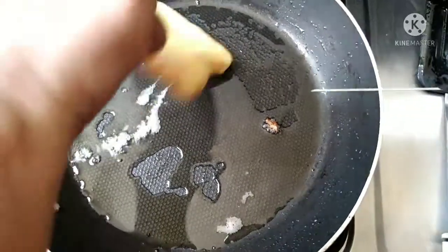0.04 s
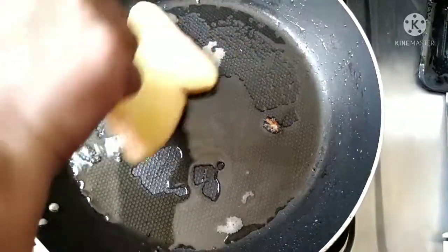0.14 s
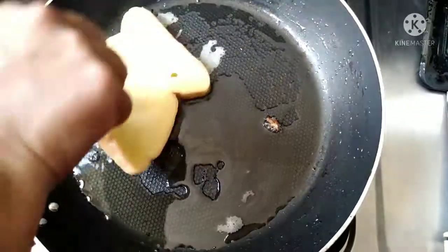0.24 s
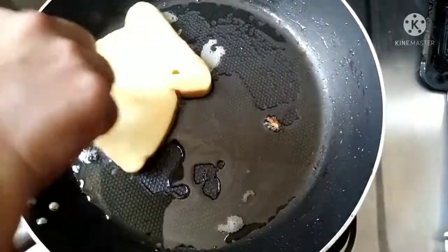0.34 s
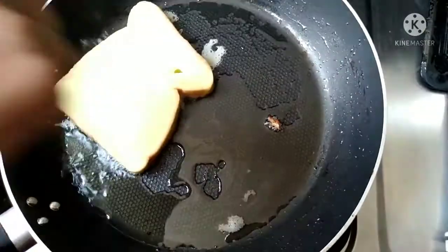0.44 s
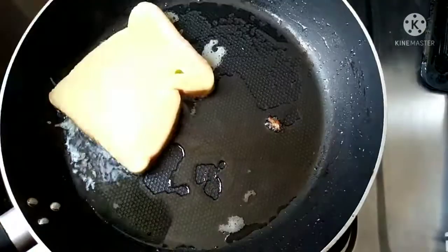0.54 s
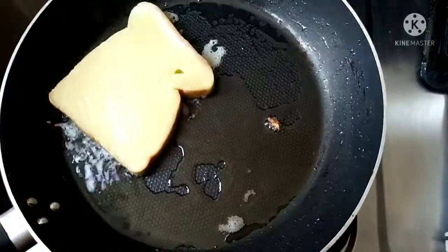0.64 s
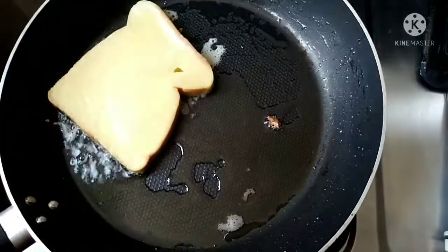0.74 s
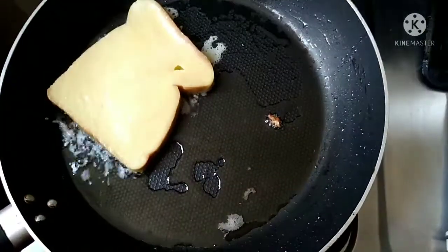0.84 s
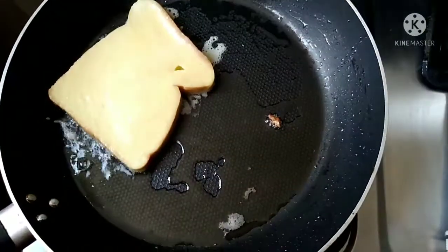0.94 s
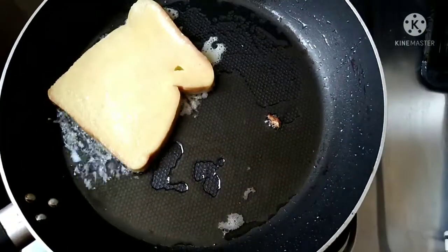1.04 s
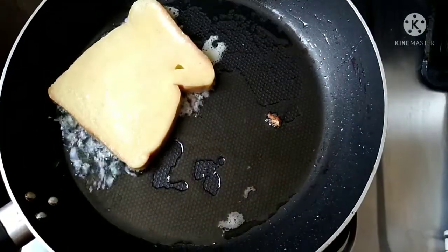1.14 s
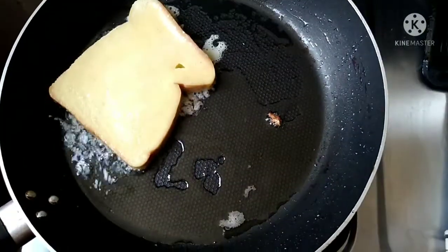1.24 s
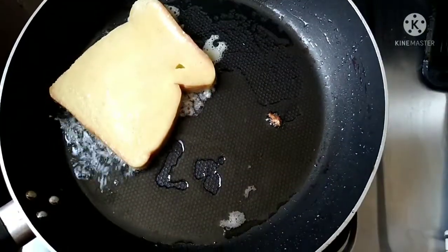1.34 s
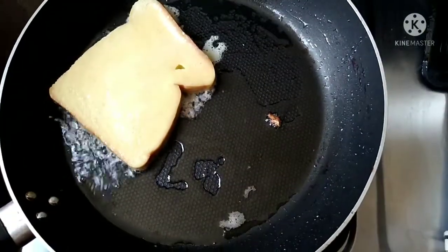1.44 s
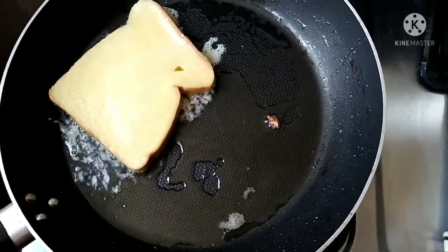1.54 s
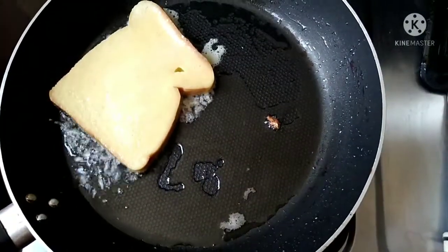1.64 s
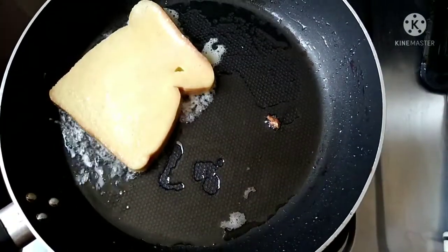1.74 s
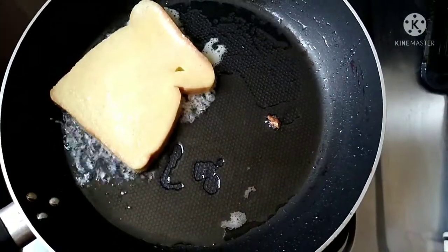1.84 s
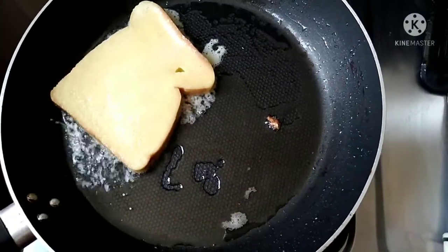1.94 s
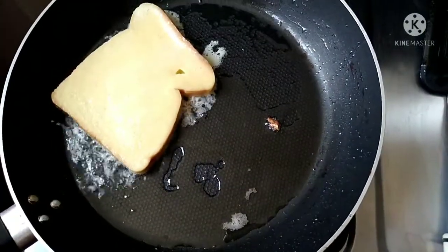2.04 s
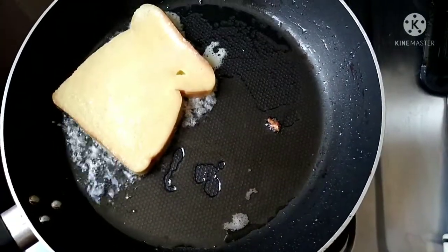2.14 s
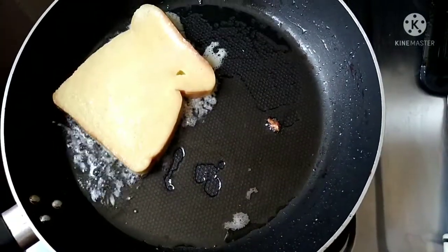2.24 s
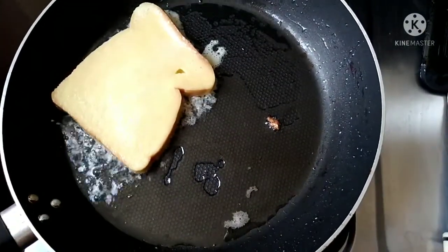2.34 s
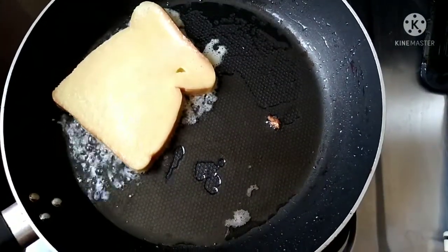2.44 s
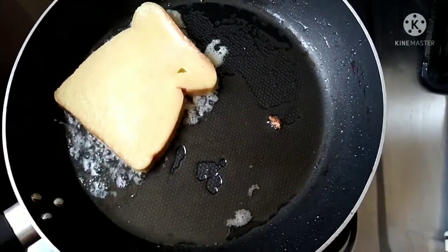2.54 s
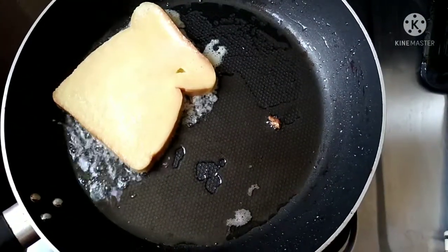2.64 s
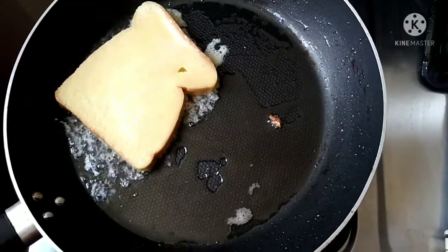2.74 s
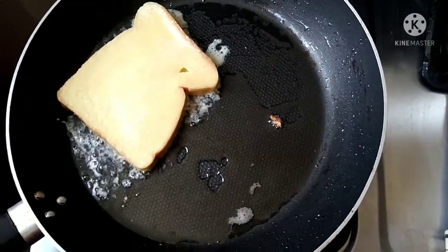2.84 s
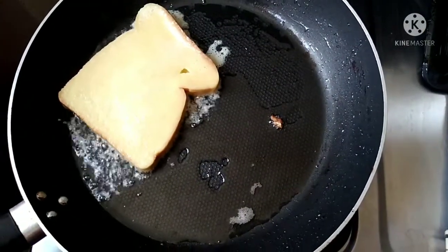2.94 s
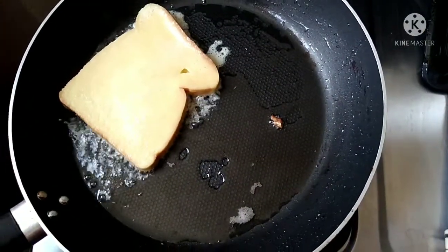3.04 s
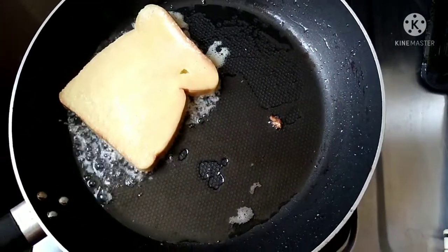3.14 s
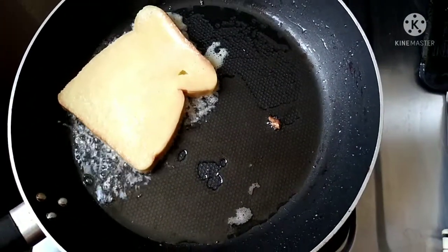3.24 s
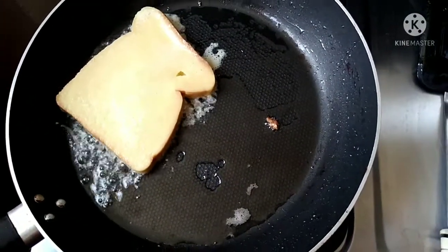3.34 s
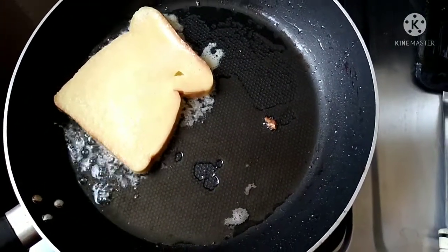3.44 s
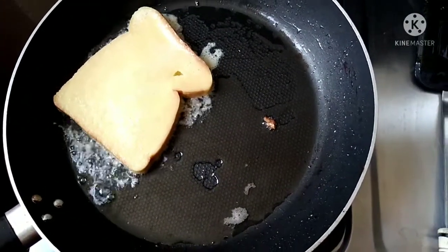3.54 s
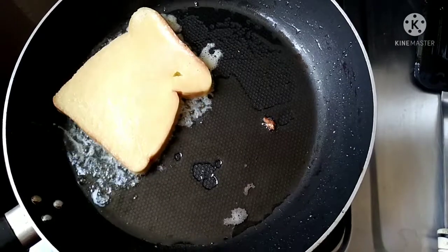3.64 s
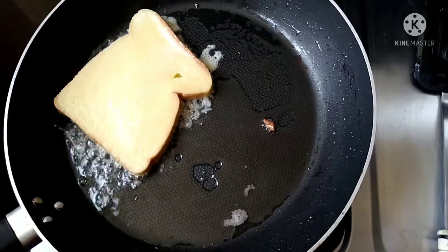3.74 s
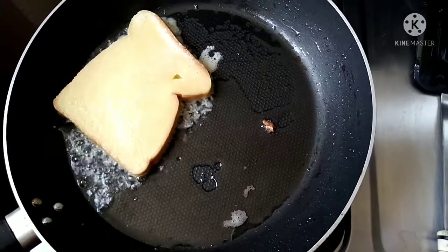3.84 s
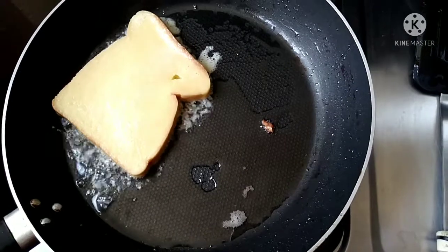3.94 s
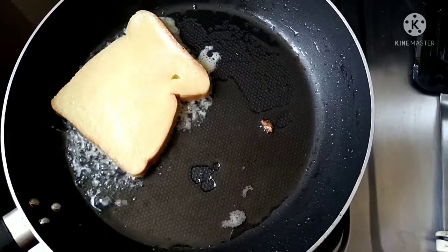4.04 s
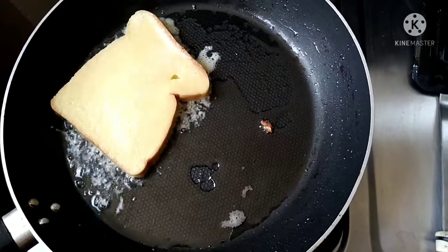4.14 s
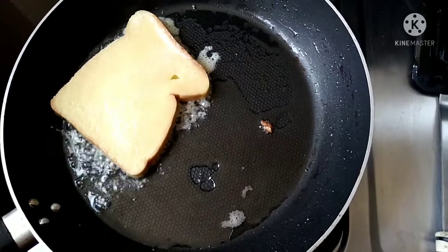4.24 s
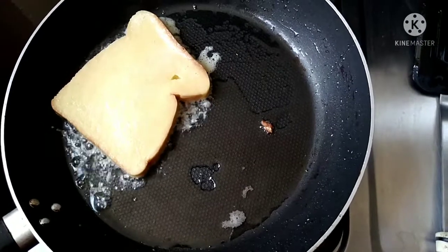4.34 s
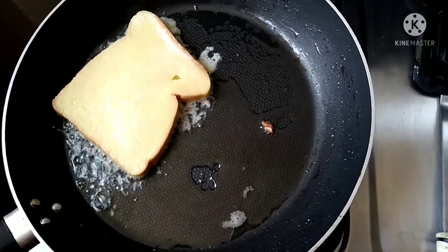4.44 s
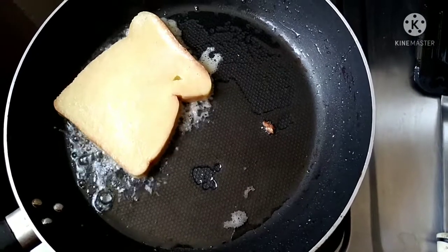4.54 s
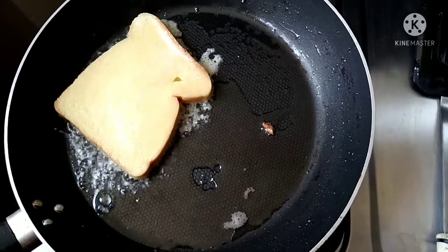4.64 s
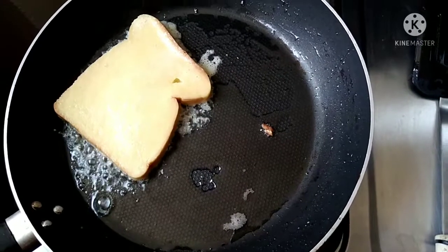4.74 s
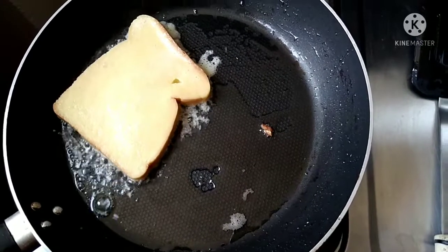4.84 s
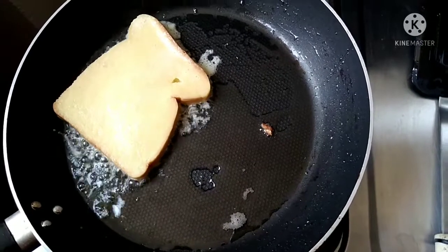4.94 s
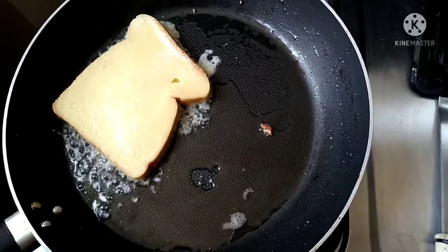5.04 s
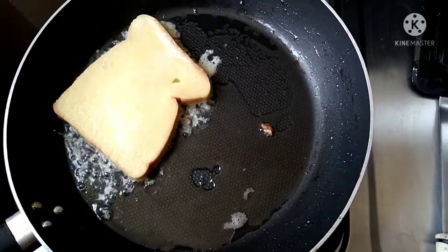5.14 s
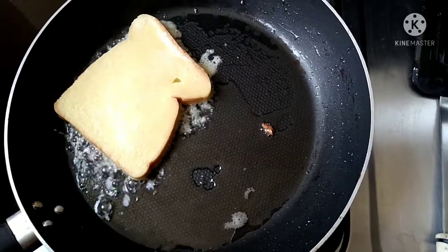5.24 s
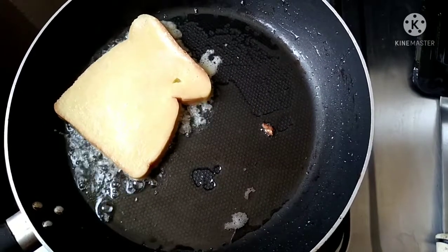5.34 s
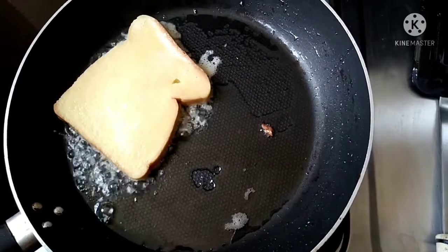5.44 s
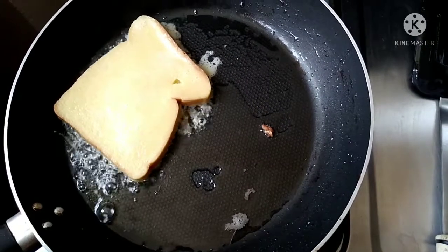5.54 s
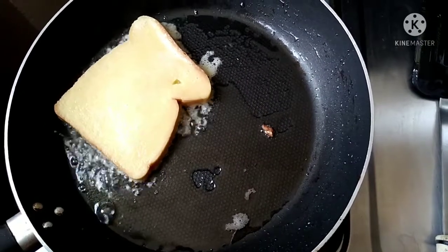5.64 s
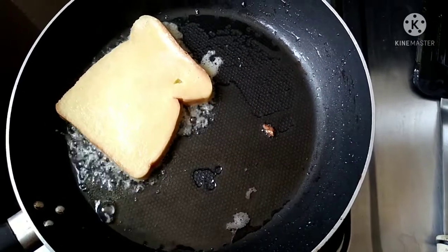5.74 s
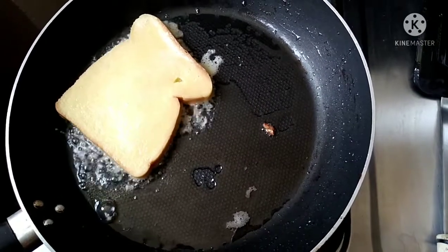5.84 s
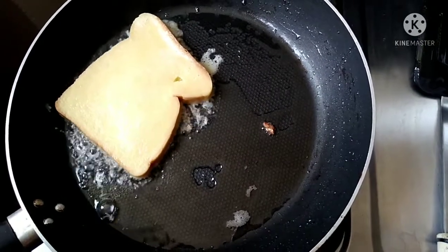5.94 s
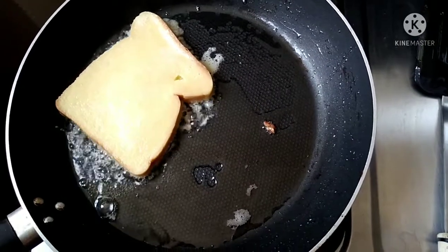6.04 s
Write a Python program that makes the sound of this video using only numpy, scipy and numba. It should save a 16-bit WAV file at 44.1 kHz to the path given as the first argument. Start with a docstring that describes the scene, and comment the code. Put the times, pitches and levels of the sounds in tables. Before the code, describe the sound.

Soaked bread goes into hot fat and sizzles brightly, growing denser with crackles and sharp spits, over a faint low rumble and a passing engine.

```python
"""Soaked bread in hot fat

Soaked bread fries close to two microphone ports: a crowd of small ringing steam bubbles makes a dense fizz.
Larger bubbles sputter in clusters and spitting fat snaps; shifting noise tails stand in for the pan wall.
Outside an engine gathers speed: sine orders swell and fade as they cross the kitchen's pitches, then die.
Filtered noise rumbles low beneath, and one dull bump is a handful of slow ringing pulses."""
import sys
import numpy as np
from scipy import signal
from scipy.fft import rfft, irfft, next_fast_len
from scipy.io import wavfile
from scipy.ndimage import uniform_filter1d
from numba import njit

SR = 44100
rng = np.random.default_rng(int(sys.argv[2]) if len(sys.argv) > 2 else 0)


def wav_record(signal):
    """Record a signal, one row per channel, as 16-bit PCM in the file named by sys.argv[1]."""
    frames = np.transpose(np.atleast_2d(signal))
    bounded = np.clip(frames, -1, 1)
    # unit amplitude maps onto the largest positive 16-bit level
    quanta = np.round(bounded * 32767).astype(np.int16)
    wavfile.write(sys.argv[1], SR, quanta)


N = 268392

# All source levels are mix settings, ahead of layer trims and the port colour.
# course of the frying: t/s, fizz level/dB, fine spray over fizz level/dB
FRYING = [(0.0, -32, -2.5), (0.52, -31.5, -4), (1.17, -26, -8), (1.4, -28, -8), (1.62, -26, -4),
          (1.72, -33, -0.5), (1.86, -25.5, -5.5), (2.6, -25, -6.5), (3.35, -25, -6.5), (3.6, -23, -7),
          (5.5, -22, -6), (5.75, -24, -6.5), (6.09, -24.5, -5)]
# fizz bubble sizes heard as pitch: f/Hz, level/dB
BUBBLE_SIZES = [(500, -40), (1500, -20.5), (2200, 3), (2800, 1), (4800, 5), (5300, -14), (7000, -3)]
# loudest sputters of large bubbles: t/s of the peak, level/dB, f/Hz, length/ms
LOUD_SPUTTERS = [(0.5601, -13.5, 2800, 4.2), (0.579, -21, 2570, 5.5), (0.764, -19, 3360, 3.1),
                 (0.8184, -17, 3280, 6), (0.8601, -16, 2820, 5), (0.9115, -20, 3150, 9.5),
                 (0.984, -18.5, 3300, 8), (1.07, -16, 2800, 9.7), (1.143, -12.5, 3074, 5),
                 (1.197, -15, 2574, 21), (1.246, -15.5, 3050, 9), (1.3034, -9.5, 3230, 3.9),
                 (1.3226, -17.5, 4930, 28), (1.362, -13.5, 3600, 10), (1.4822, -18.5, 3380, 12.3),
                 (1.5167, -13, 3110, 4), (1.5232, -11.5, 3100, 3.6), (1.553, -11.5, 2800, 8),
                 (1.658, -14.5, 4400, 8.4), (1.7784, -9.5, 2850, 15), (1.862, -15.5, 3620, 24),
                 (1.8753, -10.5, 2990, 4), (1.9056, -18, 3600, 17), (1.931, -14.5, 3770, 8),
                 (1.948, -12, 4230, 5.3), (1.9775, -16, 4430, 4.4), (2.0167, -6.5, 3020, 6),
                 (2.054, -12.5, 3620, 6), (2.064, -14, 3750, 17), (2.112, -9.5, 2710, 6.1),
                 (2.1795, -12, 3720, 8), (2.195, -14.5, 3365, 4), (2.2527, -13.5, 3800, 5.5),
                 (2.314, -12, 3290, 11.5), (2.3268, -11.5, 3480, 21), (2.392, -9, 3080, 23),
                 (2.4647, -13.5, 4353, 5), (2.5043, -9, 3000, 12.6), (2.529, -15, 3400, 15.5),
                 (2.6213, -13, 3670, 24.5), (2.7435, -12.5, 2630, 10.8), (2.7747, -12.5, 4330, 5.3),
                 (2.897, -17, 2560, 21), (2.963, -14.5, 4130, 13.4), (2.9869, -11, 3100, 7),
                 (3.0044, -10.5, 2980, 8.3), (3.021, -8, 3420, 6.3), (3.057, -10.5, 2960, 7.3),
                 (3.0723, -6.5, 3360, 6), (3.116, -19, 3100, 9), (3.1707, -11.5, 3150, 8),
                 (3.2622, -16, 4270, 5), (3.2928, -13, 3007, 13.7), (3.325, -9, 3394, 7),
                 (3.4673, -14, 3450, 11), (3.488, -10, 3330, 5.1), (3.499, -6, 2500, 9),
                 (3.522, -9, 4256, 11.7), (3.5448, -7.5, 3400, 13), (3.5962, -9.5, 2650, 15.5),
                 (3.6788, -12.5, 3530, 7), (3.703, -14, 3900, 17), (3.7256, -11, 3720, 10),
                 (3.815, -16.5, 3240, 30), (3.8799, -7, 2880, 7.4), (3.9372, -11.5, 4730, 10),
                 (3.984, -9, 3120, 9.4), (4.0321, -14, 4630, 6), (4.0817, -10.5, 4310, 7.7),
                 (4.0962, -12, 4200, 6), (4.1382, -8.5, 3580, 4.1), (4.164, -17, 4400, 7),
                 (4.195, -15.5, 3140, 9), (4.2392, -13, 3550, 6), (4.373, -16, 4440, 6.5),
                 (4.3972, -10.5, 3520, 4.4), (4.4103, -9, 3830, 10), (4.4346, -12, 3760, 7),
                 (4.471, -11.5, 4430, 9), (4.5118, -1.5, 2970, 7.2), (4.566, -12, 3200, 13),
                 (4.613, -7.5, 2770, 12), (4.661, -10.5, 3630, 8.6), (4.918, -16, 4480, 4.5),
                 (4.9552, -11, 4380, 11), (5.069, -14, 2800, 12), (5.1227, -8.5, 2650, 14.3),
                 (5.1647, -11.5, 4700, 7), (5.1898, -13, 3870, 6), (5.2582, -11.5, 2920, 14),
                 (5.2793, -7, 3200, 6), (5.335, -9.5, 4500, 11.8), (5.3492, -5.5, 4420, 7),
                 (5.4187, -13, 2800, 13.5), (5.4887, -11, 3800, 7.2), (5.5078, -10.5, 2870, 10.3),
                 (5.5237, -9.5, 3500, 4), (5.5824, -11.5, 3380, 4), (5.732, -10.5, 3700, 6.5),
                 (5.779, -9.5, 3360, 9.6), (5.8373, -11.5, 3780, 8), (5.8714, -13, 2800, 7),
                 (5.921, -15.5, 3520, 13), (6.039, -10.5, 2800, 12), (6.0539, -6.5, 3200, 8.4)]
# loudest dry snaps of spitting fat: t/s, level/dB
FAT_SNAPS = [(0.029, -19), (0.221, -26), (0.377, -19), (0.397, -28), (0.447, -22), (0.655, -18),
             (0.7282, -18), (0.8674, -19), (1.1443, -21), (1.2048, -14), (1.6312, -12.5), (1.8519, -17),
             (1.9485, -15.5), (2.041, -12), (2.2149, -19), (2.2518, -15.5), (2.2955, -10.5), (2.534, -18),
             (2.575, -15), (2.6775, -16), (2.8315, -19), (2.8923, -9), (3.2839, -16), (3.5007, -13),
             (3.8058, -17), (3.885, -15), (4.168, -16), (4.2557, -17), (4.2983, -11.5), (4.506, -8.5),
             (4.629, -14), (4.8673, -21), (5.02, -8.5), (5.0509, -12.5), (5.215, -18), (5.6314, -11),
             (5.757, -15), (5.948, -23)]
# engine run-up: t/s, shaft rate f/Hz
SHAFT_RATE = [(0, 20.4), (.62, 20.54), (.8, 22), (1.86, 27.33), (2.74, 31.04), (3.5, 32.88), (4.3, 35.96)]
# multiples of the shaft rate that sound (no unit)
SHAFT_ORDERS = [2, 4, 5, 6]
# strength of each order ahead of the kitchen's response: level/dB
ORDER_LEVELS = [-38, -38.5, -36.5, -37.5]
# bass pitches the kitchen lets in or shuts out: f/Hz, level/dB
KITCHEN_RESPONSE = [(38, -4), (48, -19), (55, -7), (60, -25), (64.5, -5), (68, 0.5), (74, -12), (102, -22),
                    (113, 1), (124, -0.5), (129, -6.5), (135, -8), (142, -24), (153, -6.5), (163, -6),
                    (172, -19), (198, -39), (212, -8)]
# pulses of the dull bump: f/Hz, level/dB, length/cycles, delay/s
BUMP_PULSES = [(55, -22, 2, 0.0037), (30, -33, 1.5, 0.0053), (400, -34, 1.8, .006)]
# relative spectrum of the rumble: f/Hz, level/dB
RUMBLE_SPECTRUM = [(12, -20), (20, 13), (35, 1.5), (64, -1), (136, 2), (230, -5.5), (340, -9), (420, -11),
                   (750, -11), (1100, -16.5), (1800, -9.5), (2400, -5), (4000, -88)]
# colour of the microphone ports: f/Hz, left level/dB, right level/dB
PORT_COLOUR = [(30, 2, -1.5), (1270, 2, 1.5), (1800, -0.5, -4.5), (2330, -0.5, -10), (2650, 7, -9),
               (4540, 5.5, -3), (7470, 7.5, -5.5), (10040, 3, 6), (11700, 2, -2.5), (15500, -4, -9)]

LEFT_LAG_S, LAG_SPREAD_S, RIGHT_SPREAD_DB = 0.00024, .00003, 3
EBB_DB, EBB_MS = -1.5, 6.8  # the fizz ebbs just before a loud sputter
SWELL_MS, SWELL_SHARE = 1.494, .25  # a sputter's swell: this long plus this share of its length
SMALL_FROM_S = .55  # chance sputters start once the bread lies in the fat
SMALL_OVER_FIZZ_DB, SMALL_SPREAD_DB, SMALL_MS = -1.5, 7, 4.3
SMALL_CLEAR_S = .026  # chance sputters keep this far from loud ones
PAN_T60_S, PAN_DB = 0.051, -3.5
ENGINE_ON_S, ENGINE_RISE_S, ENGINE_FALL_S = 0.24, 0.13, 0.052
BUMP_S = 4.4995
RUMBLE_DB = -36  # RMS
TOP_HZ = 15700


def undb(db):
    """Turn dB into an amplitude factor."""
    return 10 ** (np.asarray(db) / 20)


def level(x, db):
    """Set the RMS of a sound in dB."""
    return x * undb(db) / np.sqrt(np.mean(x ** 2))


def along(hz, table, column=1):
    """Read a f/Hz, level/dB table on a log-frequency axis."""
    table = np.array(table, float)
    return np.interp(np.log(np.maximum(hz, 1)), np.log(table[:, 0]), table[:, column])


def colour(x, table, column=1):
    """Filter by a f/Hz, level/dB table."""
    size = next_fast_len(N)
    hz = np.arange(size // 2 + 1) * SR / size
    return irfft(rfft(x, size) * undb(along(hz, table, column)), size)[:N]


def walk(rate):
    """Random levels, each held for 1 / rate s and smoothed twice; spread near 1."""
    hold = int(SR / rate)
    steps = np.repeat(rng.standard_normal(N // hold + 1), hold)
    return 1.45 * uniform_filter1d(uniform_filter1d(steps, hold), hold)[:N]


@njit
def ring(length, start, hz, cycles, size, glide):
    """Each bubble swells and fades over some cycles while its pitch may glide."""
    out = np.zeros(length)
    for k in range(len(start)):
        tau = cycles[k] * SR / hz[k] / 4  # samples from the start to the envelope's peak
        first = int(start[k]) + 1
        for i in range(max(first, 0), min(first + int(8 * tau), length)):
            u = (i - start[k]) / tau
            swell = np.e * u * np.exp(-u)
            out[i] += size[k] * swell * np.sin(np.pi / 2 * cycles[k] * u * (1 + glide[k] * u / 8))
    return out


def bubbles(s, hz, cycles, db, glide, place):
    """Bubbles scattered in the pan: place shifts the left port's lag and the right port's level."""
    hz = np.clip(hz, 50, SR / 2.3)
    left_s = s + LEFT_LAG_S + LAG_SPREAD_S * place[0]
    left = ring(N, SR * left_s, hz, cycles, undb(db), glide)
    right = ring(N, SR * s, hz, cycles, undb(db + RIGHT_SPREAD_DB * place[1]), glide)
    return np.array([left, right])


def crowd(count, lo_hz, hi_hz, cycles, scatter_db, surge_db, shape):
    """Many small bubbles: a few are much louder than the rest, and all follow the surges."""
    when, pitch, big, long = rng.random((count, 4)).T
    place = rng.standard_normal((count, 2)).T
    hz = lo_hz * (hi_hz / lo_hz) ** pitch
    db = along(hz, shape) - scatter_db * np.log(1.002 - big)
    db = db + surge_db[(when * (N - 1)).astype(int)]
    return level(bubbles(when * N / SR, hz, cycles * (.5 + long), db, 0 * hz, place), 0)


def fizz():
    """Millimetre bubbles fizz, spray hisses above, droplets tick; louder frying surges harder."""
    s, fizz_db, spray_db = np.transpose(FRYING)
    t = np.arange(N) / SR
    fizz_db = np.interp(t, s, fizz_db)
    spray_db = np.interp(t, s, spray_db)
    surge_depth = np.clip((fizz_db + 37) / 9, 0, 1)
    surge_db = surge_depth * (1.43 * walk(7) + 0.41 * walk(24.916) + 1.9 * walk(90))
    body = crowd(count=17000, lo_hz=492, hi_hz=6800, cycles=5.53, scatter_db=2.0,
                 surge_db=surge_db, shape=BUBBLE_SIZES)
    spray = crowd(count=20000, lo_hz=5340, hi_hz=15800, cycles=1.95, scatter_db=2.5,
                  surge_db=surge_db, shape=[(6000, 4.0), (16000, -6)])
    ticks = crowd(count=1100, lo_hz=2800, hi_hz=13100, cycles=2.1, scatter_db=4.0,
                  surge_db=surge_db, shape=[(2500, 5), (13000, -4)])
    mix = undb(-3.0) * body + undb(-8.5) * ticks + undb(spray_db - 2.5) * spray
    return undb(fizz_db) * mix


def ebb():
    """Gain of the fizz: it sinks towards the start of each loud sputter."""
    t = np.arange(N) / SR
    starts = [s - (SWELL_MS + SWELL_SHARE * ms) / 1000 for s, _, _, ms in LOUD_SPUTTERS]
    starts = np.sort(starts + [np.inf])  # no ebb after the last one
    wait_ms = (starts[np.searchsorted(starts, t)] - t) * 1000
    return undb(EBB_DB * np.exp(-wait_ms / EBB_MS))


def sputters(count=16):
    """One large bubble rings out; neighbours burst in a string before and after it, and spray flies."""
    rows = np.vstack([LOUD_SPUTTERS, small_sputters()])
    s, db, hz, length_ms = (np.repeat(c, count) for c in rows.T)
    swell_ms = np.minimum(SWELL_MS + SWELL_SHARE * length_ms, .8 * length_ms)
    fade_ms = length_ms - swell_ms
    when, pitch, big, fine = rng.random((len(s), 4)).T
    place = np.repeat(rng.standard_normal((len(rows), 2)), count, axis=0).T
    turn = np.arange(len(s)) % count
    lead = turn == 0
    ms = np.where(lead, 0, length_ms * (turn - when) / (count - 1) - swell_ms)
    # neighbours weaken towards both ends of the cluster, and are weaker in a short cluster
    edge_db = -4.0 * np.where(ms < 0, -ms / swell_ms, ms / fade_ms)
    edge_db = edge_db - 7.2 * big + 7.7 * np.log10(length_ms / 9)
    near_hz = np.clip(hz * 2 ** (1.1 * (pitch - .5)), 2100, 5000)
    start = s + ms / 1000 - .0008  # early, as a bubble needs time to swell
    main_db = db + np.where(lead, 1.5, edge_db - 2.3)
    main = bubbles(start, np.where(lead, hz, near_hz), np.where(lead, 8.5, 4.5),
                   main_db, -.06 + 0 * s, place)
    spray = bubbles(start, 5000 * 2 ** (1.38 * fine), 3.8 + 0 * s, db + edge_db - 11.0, 0 * s, place)
    return main + spray


def small_sputters(count=110):
    """Chance rows like LOUD_SPUTTERS, set relative to the fizz, kept in the gaps between loud ones."""
    when, big, pitch, long = rng.random((count, 4)).T
    s = SMALL_FROM_S + when * (N / SR - SMALL_FROM_S)
    fizz_db = np.interp(s, *np.transpose(FRYING)[:2])
    db = fizz_db + SMALL_OVER_FIZZ_DB + SMALL_SPREAD_DB * big
    gap_s = np.abs(s[:, None] - np.transpose(LOUD_SPUTTERS)[0]).min(axis=1)
    rows = np.transpose([s, db, 2700 * 2 ** (.8 * pitch), SMALL_MS * (.5 + long)])
    return rows[gap_s > SMALL_CLEAR_S]


def snaps(count=10):
    """Spitting fat: a quick spatter of very short bright cracks over one duller crack."""
    s, db = (np.repeat(c, count) for c in np.transpose(FAT_SNAPS))
    after, pitch, big = rng.random((len(s), 3)).T
    place = np.repeat(rng.standard_normal((len(FAT_SNAPS), 2)), count, axis=0).T
    dull = np.arange(len(s)) % count == 0
    hz = np.where(dull, 500 * 2 ** (1.3 * pitch), 6000 * 2 ** (1.4 * pitch))
    db = db + np.where(dull, -21.0, .6 - 2.0 * big - 5.2 * after)
    start = s + .012 * after * ~dull  # bright cracks spread over 12 ms
    return bubbles(start, hz, np.where(dull, 2.2, 3.2), db, 0 * s, place)


def pan_wall(x, size=1024):
    """Quick dense reflections; bursts come from ever new places, so each short slice gets a new tail."""
    hop, count = size // 2, N // (size // 2) + 1
    t = np.arange(2 * size) / SR
    decay = np.exp(-np.log(1000) * t / PAN_T60_S) * (t > .0006)
    tail = rng.standard_normal((2, count, len(t))) * decay
    tail *= undb(PAN_DB) / np.sqrt(np.sum(tail ** 2, axis=2, keepdims=True))
    padded = np.pad(x, ((0, 0), (hop, 2 * size)))
    slices = padded[:, hop * np.arange(count)[:, None] + np.arange(size)] * np.hanning(size + 1)[:-1]
    long = 4 * size  # room for slice plus tail
    wet = irfft(rfft(slices, long) * rfft(tail, long), long)
    out = np.zeros((2, count * hop + long))
    for k in range(count):
        out[:, k * hop:k * hop + long] += wet[:, k]
    return x + out[:, hop:hop + N]


def engine():
    """Sine orders of the shaft rate, loud at pitches the kitchen favours; the driver lifts off at the end."""
    s, hz = np.transpose(SHAFT_RATE)
    t = np.arange(N) / SR
    hz = np.interp(t, s, hz)
    phase = 2 * np.pi * np.cumsum(hz) / SR
    drone = np.zeros(N)
    for order, db in zip(SHAFT_ORDERS, ORDER_LEVELS):
        gain = undb(db + along(order * hz, KITCHEN_RESPONSE))
        drone += gain * np.sin(order * phase + 2 * np.pi * rng.random())
    rise = np.clip((t - ENGINE_ON_S) / ENGINE_RISE_S, 0, 1)
    fall = np.clip((s[-1] - t) / ENGINE_FALL_S, 0, 1)
    return np.sqrt(2) * drone * rise * fall  # order levels count as RMS


def thud():
    """A dull bump: a slow push with a short knock on top."""
    hz, db, cycles, late = np.transpose(BUMP_PULSES)
    return ring(N, (BUMP_S + late) * SR, hz, cycles, undb(db), 0 * hz)


def rumble():
    """Street and burner: slowly wavering noise, widest in the deepest bass, nearly mono higher up."""
    mid, side = (colour(rng.standard_normal(N), RUMBLE_SPECTRUM) for _ in range(2))
    side = colour(side, [(25, -2), (125, -10.5), (500, -9), (1000, -8.0), (1800, -33.0)])
    stereo = mid + side * np.array([[1], [-1]])
    return level(undb(0.93 * walk(1.64)) * stereo, RUMBLE_DB)


def scene():
    """Frying inside the pan wall, with engine, bump and rumble outside it."""
    frying = ebb() * fizz() + sputters() + snaps()
    return pan_wall(frying) + engine() + rumble() + thud()


def record(dry):
    """Each port has its colour; the loudest peaks are rounded off; the top is cut."""
    ports = np.array([colour(dry[k], PORT_COLOUR, column=k + 1) for k in range(2)])
    rounded = ports / (1 + (ports / .8) ** 4) ** .25
    top_cut = signal.ellip(14, .2, 100, TOP_HZ, fs=SR, output="sos")
    return signal.sosfilt(top_cut, rounded)


dry = scene()
out = record(dry)
wav_record(out)
```